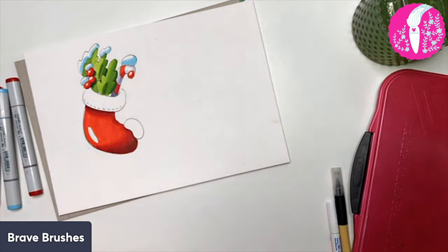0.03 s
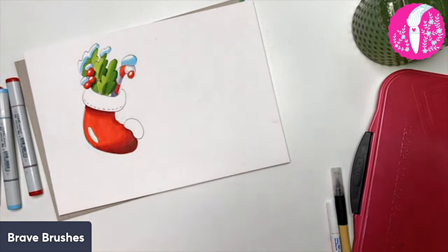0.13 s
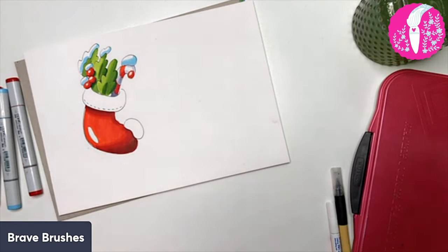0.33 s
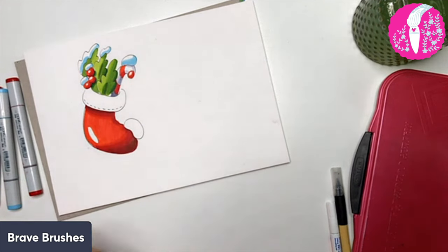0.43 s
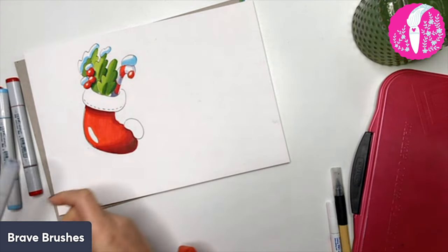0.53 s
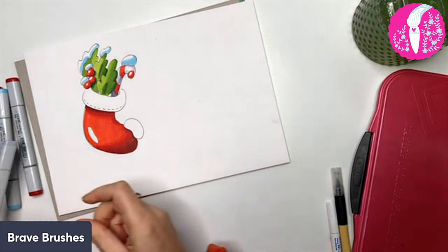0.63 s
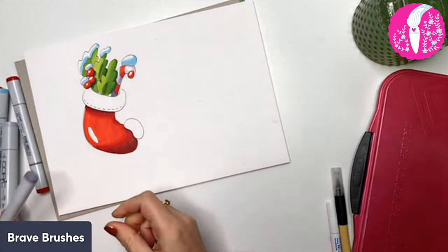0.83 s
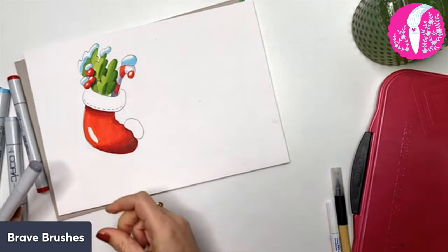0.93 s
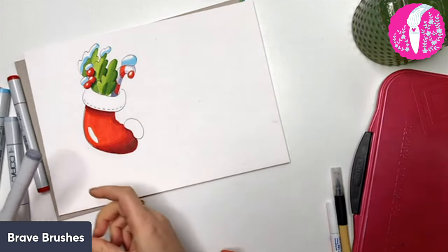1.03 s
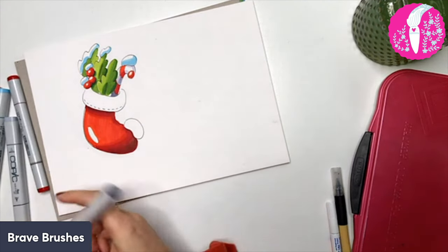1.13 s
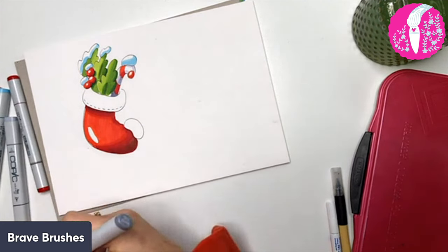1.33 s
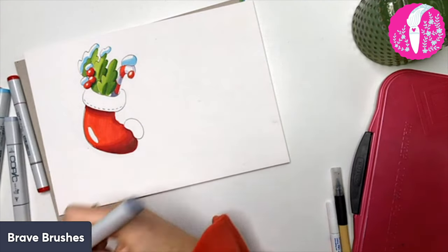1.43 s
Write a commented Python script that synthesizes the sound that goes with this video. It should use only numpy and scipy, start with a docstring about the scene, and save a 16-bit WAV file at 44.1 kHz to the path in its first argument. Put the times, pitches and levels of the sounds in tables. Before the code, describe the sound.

A plastic marker cap snaps shut, then markers knock and rattle on a desk indoors.

```python
"""Marker caps and a small desk

A plastic marker cap snaps shut in a small room; markers knock, bounce and rattle on a desk, then a cap is
eased loose with small clicks. Each blow is a sum of damped modes; friction is noise or random grains through
resonances. Hands and sleeve rustle faintly over still air, and a filtered noise tail gives the room."""
import sys
import numpy as np
from scipy import signal
from scipy.fft import rfft, irfft, next_fast_len
from scipy.io import wavfile

SR = 44100
rng = np.random.default_rng(int(sys.argv[2]) if len(sys.argv) > 2 else 0)


def unload_wav(signal):
    """Save mono or channel-first audio to the path in sys.argv[1] as 16-bit WAV at rate SR, clipped to [-1, 1]."""
    wavfile.write(
        sys.argv[1],
        SR,
        np.round(np.clip(np.atleast_2d(signal).T, -1, 1) * 32767).astype(np.int16),
    )


N = 66150  # 1.5 s


def amp(db):
    """Decibel law: level to linear amplitude."""
    return 10 ** (np.asarray(db) / 20)


def unit(x):
    """Normalisation to an rms of 1."""
    return x / np.sqrt(np.mean(x ** 2) + 1e-20)


def along(points, hz):
    """Interpolation of (hz, value) points on a logarithmic frequency axis."""
    point_hz, value = np.transpose(points)
    return np.interp(np.log(hz + 1), np.log(point_hz + 1), value)


def filtered(x, response):
    """Linear filtering: the spectrum of x times a response of frequency."""
    size = next_fast_len(N + SR // 2)
    spectrum = rfft(x, size) * response(np.fft.rfftfreq(size, 1 / SR))
    return irfft(spectrum, size)[..., :N]


def level(rows):
    """Amplitude envelope along (time_s, level_db) rows, with 40 ms fades from and to -100 dB."""
    s, db = np.transpose(rows)
    return amp(np.interp(np.arange(N) / SR, [s[0] - .04, *s, s[-1] + .04], [-100, *db, -100]))


SCATTER_DB, DETUNE = 1.5, .025  # standard deviations per mode: level, and pitch as a fraction
MOST_CYCLES, RISE_CYCLES = 18, 0.4  # longest 60 dB decay in cycles; rise time in cycles of dull_hz


def ring(modes, dull_hz, thin_hz=50, cycles=MOST_CYCLES):
    """Modal synthesis of one blow: damped modes vary each time; a soft contact loses the high ones."""
    t = np.arange(SR // 8) / SR
    hz, db, t60 = np.transpose(modes)[:, :, None]
    scatter, detune, phase = rng.standard_normal((3, *hz.shape))
    decay_db = 60 * t / np.minimum(t60, cycles / hz)
    gains = amp(db + SCATTER_DB * scatter - decay_db)
    gains = gains / (1 + (hz / dull_hz) ** 4)
    gains = gains / (1 + (thin_hz / hz) ** 2)
    tones = np.sum(gains * np.sin(2 * np.pi * hz * (1 + DETUNE * detune) * t + phase), axis=0)
    rise = (1 - np.exp(-t * dull_hz / RISE_CYCLES)) ** 2
    return tones * rise / 2


def add(track, s, sound):
    """Superposition: mix a sound into the track, in place, at s seconds."""
    part = track[round(s * SR):][:len(sound)]
    part += sound[:len(part)]


def grains(rate, spread_db):
    """Random impulse process: tiny contacts, on average rate a second, at rms 1."""
    contacts = rng.random(N) < rate / SR
    strength = rng.standard_normal(N) * amp(spread_db * rng.standard_normal(N))
    return unit(contacts * strength)


def body(peaks):
    """Parallel resonance: (pitch_hz, width_hz, level_db) band-passes summed with alternating sign."""
    def response(f):
        total = 0
        for k, (hz, width, db) in enumerate(peaks):
            total = total + (-1) ** k * amp(db) * 1j * f * width / (hz * hz - f * f + 1j * f * width)
        return total
    return response


# spectrum shape of the still air: pitch_hz, density_db
AIR_SPECTRUM = [(25, -19), (60, -23), (100, -15), (130, -7), (200, -0.5), (300, -8.5), (600, -17.5),
                (1500, -16.5), (3000, -23), (6000, -24.5), (11000, -41.5)]
AIR_DB = -78  # rms level


def still_air():
    """Stationary coloured noise: a steady faint hush."""
    noise = rng.standard_normal(N)
    return amp(AIR_DB) * unit(filtered(noise, lambda hz: amp(along(AIR_SPECTRUM, hz))))


# strength of the rubbing: time_s, level_db
RUSTLE_LEVEL = [(.3, -69), (.5, -72.5), (.545, -64), (.57, -58.5), (.6, -63), (.625, -57.5), (.65, -63),
                (.69, -64), (.8, -71), (1.1, -66), (1.22, -69.5), (1.27, -60), (1.3, -66), (1.33, -64),
                (1.38, -69), (1.44, -58), (1.47, -61), (1.5, -106)]
# broad resonances of cloth and skin: pitch_hz, width_hz, level_db
CLOTH = [(425, 500, -6.5), (1600, 1500, -11.5), (2678, 570, 6.5), (3140, 1400, -1), (6600, 1500, -15)]


def rustle():
    """Friction of cloth and skin: dense grains excite a few broad resonances."""
    return level(RUSTLE_LEVEL) * unit(filtered(grains(9000, spread_db=1), body(CLOTH)))


# colour of the whole room tail: pitch_hz, level_db
ROOM_COLOUR = [(100, -27.5), (400, -7), (1500, -3), (3500, -2), (6000, -3), (11000, -13.5)]
# decay time of the lingering tail: pitch_hz, t60_s
LATE_DECAY = [(100, 1), (1000, 0.85), (3500, 0.83), (11000, 0.52)]
EARLY_DB, EARLY_PEAK_S, EARLY_T60 = -39, 0.045, 0.18  # level at the peak, its time, then decay time in s
GATHER_DB, LATE_DB = 7, -50  # early rise up to the peak; starting level of the late tail


def room(x):
    """Reverberation by convolution: near walls gather to a peak and die fast; a weaker tail lingers."""
    hz, t, (early, late) = signal.stft(rng.standard_normal((2, SR)), SR, nperseg=128)
    rise_db = GATHER_DB * (t / EARLY_PEAK_S - 1)
    fall_db = -60 * (t - EARLY_PEAK_S) / EARLY_T60
    gather_db = np.where(t < EARLY_PEAK_S, rise_db, fall_db)
    late_db = LATE_DB - 60 * t / along(LATE_DECAY, hz)[:, None]
    both = early * amp(EARLY_DB + gather_db) + late * amp(late_db)
    tail = signal.istft(both * amp(along(ROOM_COLOUR, hz)[:, None]), SR, nperseg=128)[1]
    delayed = np.pad(x, (260, 0))  # about 6 ms
    return signal.fftconvolve(delayed, tail)[:N]


# markers rattling and dragging on the desk: time_s, level_db
SCUFF_LEVEL = [(.7, -40.5), (.73, -45), (.77, -60), (.8, -54.5), (.825, -68), (.85, -43.5), (.885, -50.5),
               (.905, -41), (.925, -33.5), (.945, -28.5), (.98, -41), (1.02, -64)]


def scuff():
    """Friction-driven resonance: grains of rattling, dragging contact sound wood and barrel."""
    wood = body([(hz, 60 + hz / 5, db) for hz, db, _ in DESK + BARREL])
    return level(SCUFF_LEVEL) * unit(filtered(grains(5000, spread_db=2), wood))


# clicks as another cap is eased loose: start_s, level_db, dull_above_hz, thin_below_hz
EASES = [(1.4096, -39.5, 9000, 2135), (1.4202, -32, 7100, 493), (1.4245, -38.5, 9450, 1490)]
# modes of the loosened cap: pitch_hz, level_db, t60_s
LOOSE = [(544, 0.5, 0.018), (1290, -3, 0.03), (2190, 4, .012), (2480, 5.5, .016), (3500, 4, 0.0058),
         (5980, 6, .008), (7500, 2.5, .008), (10400, 4, .006)]
# the cap sliding off the barrel: time_s, level_db
PULL = [(1.432, -57.5), (1.448, -56), (1.468, -83.5)]


def loose_cap():
    """Impact and friction on one resonator: small clicks, then a soft slide through three of its modes."""
    slide_modes = LOOSE[::5] + LOOSE[3:4]
    resonances = body([(hz, 60 + hz / 12, db) for hz, db, _ in slide_modes])
    out = level(PULL) * unit(filtered(rng.standard_normal(N), resonances))
    for s, db, dull_hz, thin_hz in EASES:
        add(out, s, amp(db) * ring(LOOSE, dull_hz, thin_hz, 2 * MOST_CYCLES))
    return out


# contacts of marker and desk: start_s, desk_db, barrel_db, edge_db, dull_above_hz
TAPS = [(.6975, -23, -41, -29, 5060), (0.7128, -27.5, -29.5, -32.5, 6000),
        (0.718, -26.5, -45.5, -43.5, 2970), (0.7438, -35.5, -48, -57.5, 5000),
        (0.7892, -41, -22, -76, 1300), (.895, -34, -62.5, -72, 3000), (0.8995, -20, -16.5, -43, 4000),
        (.9013, -29.5, -23, -31, 3500), (0.9048, -18, -21.5, -64.5, 3000), (0.9134, -19.5, -57, -64, 3940),
        (0.9317, -20.5, -16.5, -44, 3590), (.934, -24.5, -10.5, -37.5, 2060),
        (0.938, -31.5, -18, -51, 2410), (0.9431, -30.5, -54, -66, 3000), (0.9504, -23, -27.5, -51, 4000)]
# modes of the desk: pitch_hz, level_db, t60_s
DESK = [(159.8, -13.5, 0.12), (272, -1, 0.11), (333.4, -4, 0.067), (404.4, 4.5, 0.027), (550, -2.5, 0.046),
        (604, -21.5, 0.063), (703, 4.5, .04)]
# modes of the marker barrel: pitch_hz, level_db, t60_s
BARREL = [(1120, 9.5, 0.0087), (1404, -16.5, 0.018), (1682, -6, 0.024), (1838, 8, 0.018), (2240, 9, 0.0094),
          (2600, 7.5, 0.022), (3510, 9.5, 0.011), (3740, 8, 0.015), (4800, -2.5, .006), (5700, -12, 0.0055),
          (6600, -27.5, .005)]
# modes of the hard edge: pitch_hz, level_db, t60_s
EDGE = [(8100, -20, .01), (8480, 15, .004), (10500, -26, .004)]
CRACK_DB, CRACK_T60 = 1.5, 0.012  # noise burst: level relative to edge_db, decay time in s


def taps():
    """Coupled impact: each contact thumps the desk, rings the barrel and ticks on its hard edge."""
    out, t = np.zeros(N), np.arange(SR // 50) / SR
    for s, desk_db, barrel_db, edge_db, dull_hz in TAPS:
        add(out, s, amp(desk_db) * ring(DESK, dull_hz))
        add(out, s, amp(barrel_db) * ring(BARREL, dull_hz))
        add(out, s, amp(edge_db) * ring(EDGE, SR))
        crack = amp(edge_db + CRACK_DB - 60 * t / CRACK_T60)
        add(out, s, crack * rng.standard_normal(len(t)))
    return out


# a cap click as the walls hear it, all directions blended: pitch_hz, level_db
CAP_TO_WALLS = [(150, 5), (400, 19), (900, 14), (1500, 15.5), (2400, 15), (3500, 26.5), (4600, 20),
                (6000, 14.5), (8500, 23), (11000, 17.5)]


def cap_afar():
    """Directional radiation, blended: impulses at the cap's blows take the smooth colour the walls hear."""
    blows = np.zeros(N)
    for s, db, _, _ in CLICKS:
        blows[round(s * SR)] = amp(db)
    return filtered(blows, lambda hz: amp(along(CAP_TO_WALLS, hz)))


# clicks of the closing cap: start_s, level_db, dull_above_hz, thin_below_hz
CLICKS = [(.1987, -28.5, 2950, 408), (0.2018, -18.5, 5010, 1926), (0.206, -5, 9000, 1584),
          (0.2175, -40, 5000, 500), (0.2339, -32, 4920, 1523), (0.8545, -35.5, 5700, 2440)]
# modes of the cap: pitch_hz, level_db, t60_s
CAP = [(510, -5.5, .03), (1480, 8.5, 0.0027), (2614, -5, 0.01), (3243, 8.5, 0.008), (4530, 14.5, .007),
       (5100, 8.5, .006), (5980, -13.5, .005), (6900, 9, .005), (9030, 12.5, .005), (10150, 9, .006)]
# the cap scrapes over its ridge, seats and shudders: time_s, level_db
SLIDE = [(.2016, -33), (.2054, -23), (.2068, -14), (.209, -22), (.2135, -36)]


def cap():
    """Snap-fit impact: clicks over ridges, and a brief scrape swelling into the main snap, then dying."""
    out = np.zeros(N)
    for s, db, dull_hz, thin_hz in CLICKS:
        add(out, s, amp(db) * ring(CAP, dull_hz, thin_hz))
    resonances = body([(hz, 900, db) for hz, db, _ in CAP])
    scrape = unit(filtered(rng.standard_normal(N), resonances))
    slide_s, slide_db = np.transpose(SLIDE)
    swell = amp(np.interp(np.arange(N) / SR, slide_s, slide_db, left=-120, right=-120))
    return out + swell * scrape


LOOSE_TO_WALLS_DB = -7.5  # the hand covers the loosened cap
BASS_HZ = 140  # corner of the high-pass on all hits and scuffs


def scene():
    """Superposition of direct and reverberant sound: high-passed hits over rustle and still air."""
    knocks, loose = taps(), loose_cap()
    to_walls = knocks + cap_afar() + amp(LOOSE_TO_WALLS_DB) * loose
    hits = cap() + knocks + loose + room(to_walls) + scuff()
    hits = filtered(hits, lambda hz: (1j * hz / (1j * hz + BASS_HZ)) ** 3)
    return (hits + rustle() + still_air())[None]


TOP_HZ = 11900  # nothing passes above; the fade starts 900 Hz lower


def record(dry):
    """Soft saturation towards 0.9 of full scale, then band limiting."""
    soft = dry / (1 + np.abs(dry / .9) ** 6) ** (1 / 6)
    return filtered(soft, lambda hz: np.clip((TOP_HZ - hz) / 900, 0, 1))


dry = scene()
out = record(dry)
unload_wav(out)
```